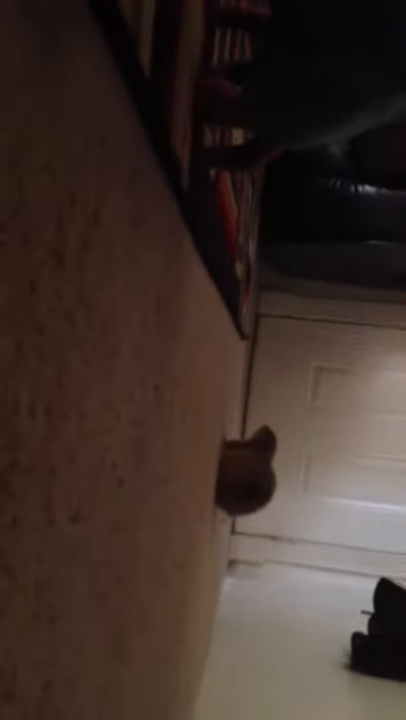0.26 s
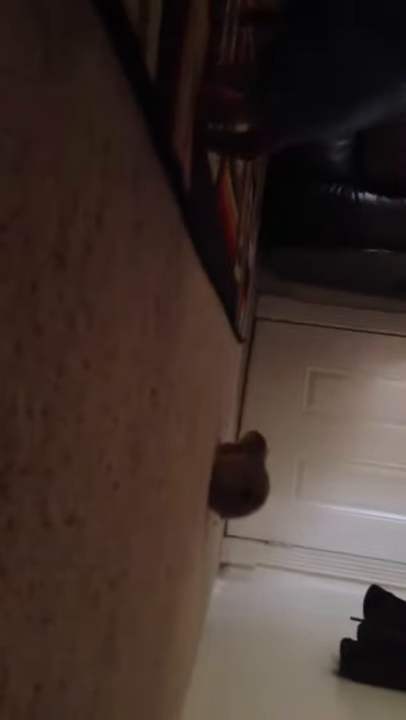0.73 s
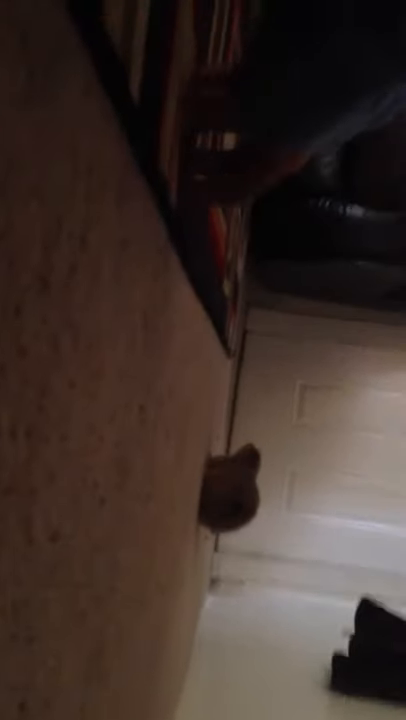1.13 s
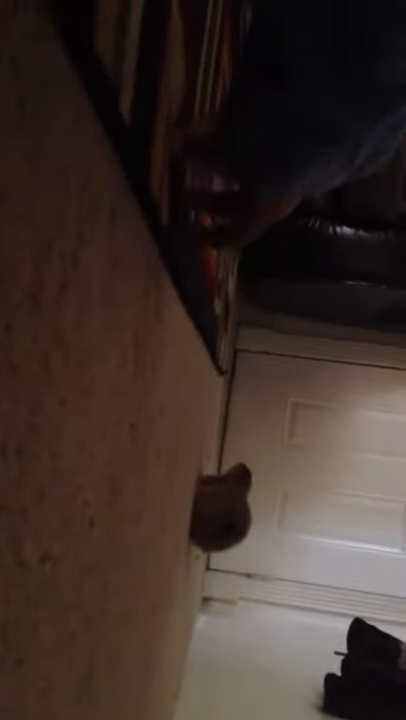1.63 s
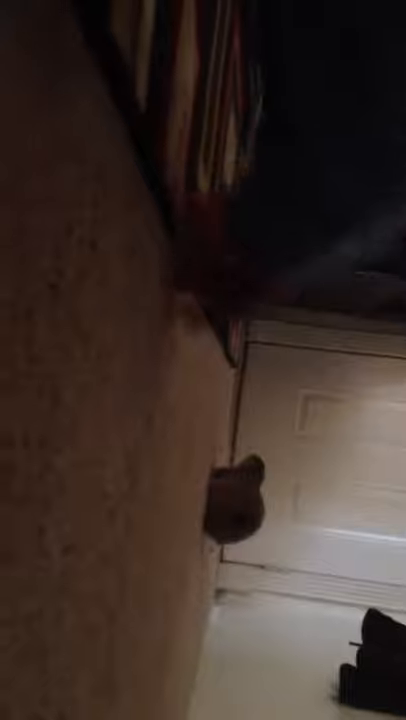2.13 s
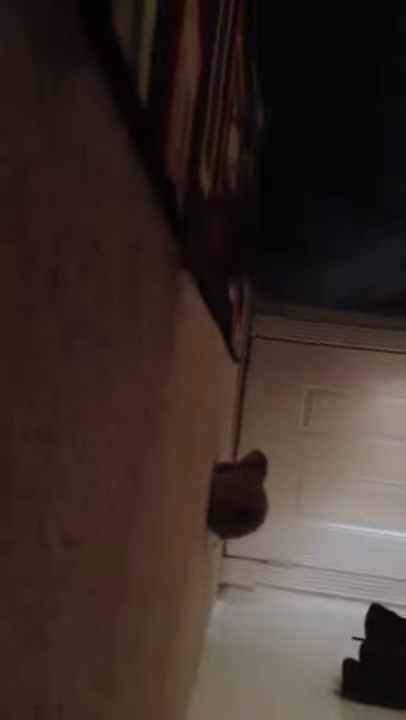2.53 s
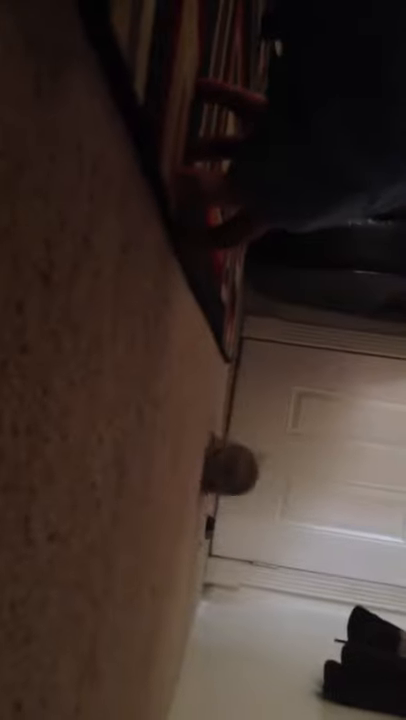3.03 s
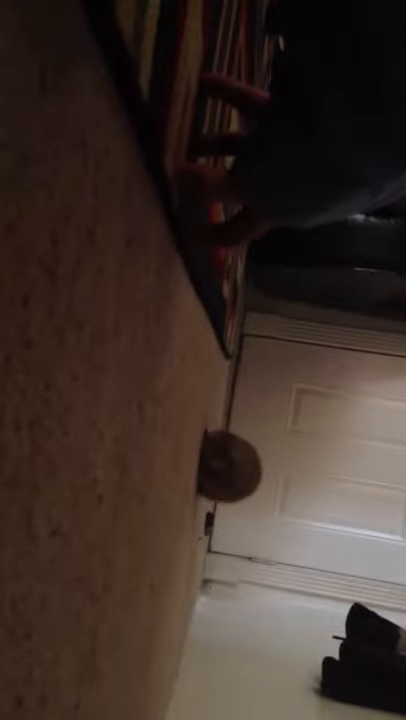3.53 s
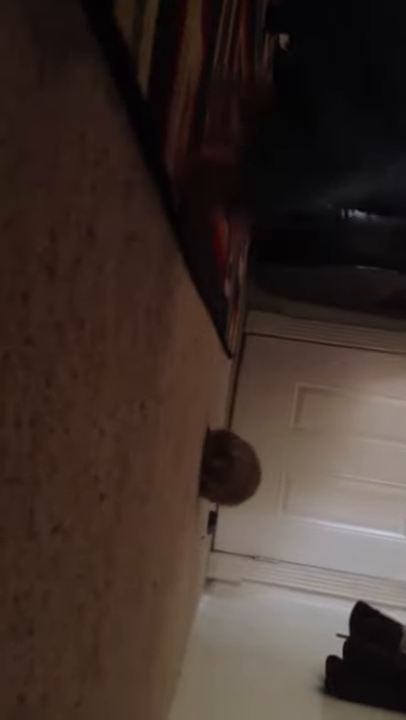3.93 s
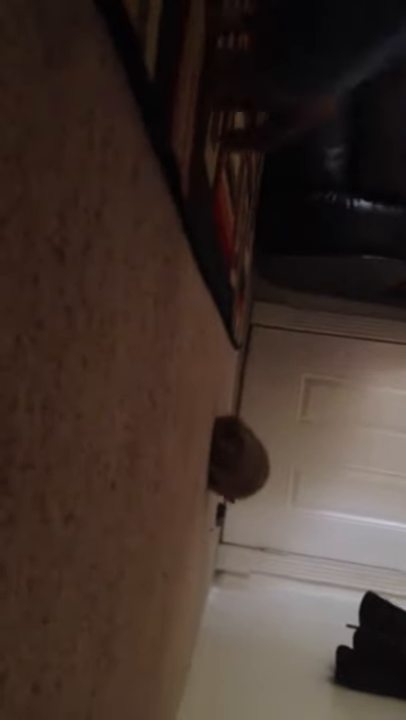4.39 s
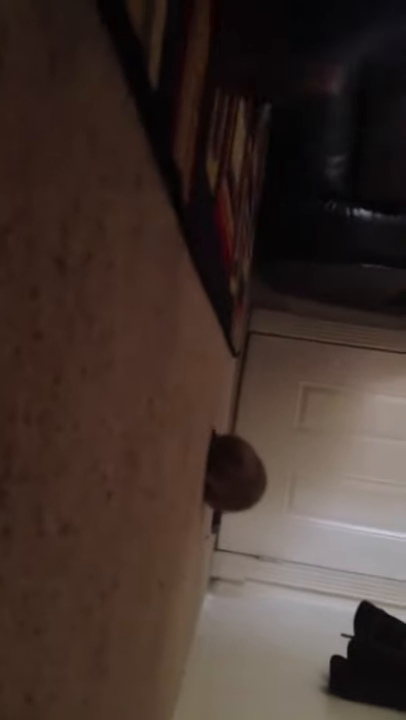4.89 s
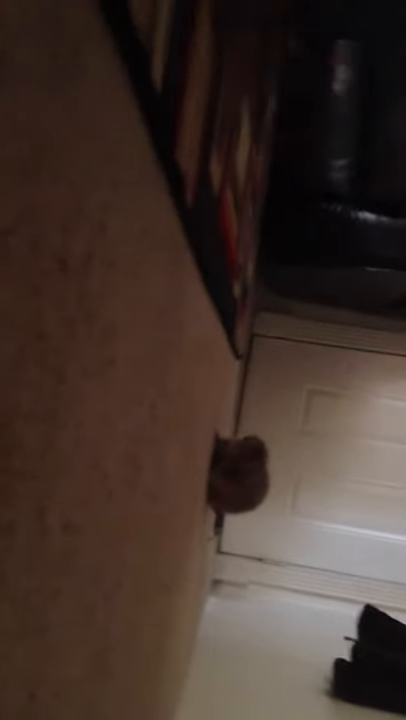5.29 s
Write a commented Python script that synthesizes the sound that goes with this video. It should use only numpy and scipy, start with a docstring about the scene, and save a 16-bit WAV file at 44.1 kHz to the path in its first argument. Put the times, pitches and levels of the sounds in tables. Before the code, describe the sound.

A hand and a small rodent play-fight on a rug, heard close and near the floor in a furnished room with a short, faint tail. Steady low air, soft hiss and a barely audible hum run throughout. A small dull bump comes at once, then from about 0.5 s quick strokes scuff the pile and drum the floor. Around 0.7 s there is a cluster of sharp little ticks with a soft thud; firm scratchy strokes follow to 1.3 s, with light taps and sleeve rustle. Lighter strokes and patter continue to 2.3 s, then thin out: a weak brush and tap near 2.6 s, another at 3.0 s. In the lull, a very brief soft low tone swells at 3.3 s. Strokes return at 3.7 s, crisp at 4.0 to 4.1 s, uneven through 4.5 s, strongest just before 5.0 s with a tick, then scuffing and rustling to the end at about 5.5 s.

```python
"""A hand and a small rodent play-fight on a rug, heard close, near the floor.
From the start: air, hiss and a faint hum (filtered noise); a sleeve drags and rustles (noise following the arm);
quick strokes scuff the pile and drum the floor (random fibre slips). Bumps (short pushes), light taps
(crunching contacts) and a few sharp ticks (bare pulses) fall among them. Strokes thin out after 2.3 s;
one soft low tone swells in the lull at 3.3 s, then the scuffle returns. A room tail follows it throughout."""
import sys
import numpy as np
from scipy import signal
from scipy.fft import rfft, irfft, next_fast_len
from scipy.io import wavfile
from scipy.ndimage import map_coordinates

SR = 44100
rng = np.random.default_rng(int(sys.argv[2]) if len(sys.argv) > 2 else 0)


def transcribe(signal):
    """Save signal, clipped to [-1, 1], as a 16-bit WAV file at the path in sys.argv[1]."""
    frames = np.atleast_2d(signal).T
    limited = np.clip(frames, -1, 1)
    pcm = np.round(limited * 32767).astype(np.int16)
    wavfile.write(sys.argv[1], SR, pcm)


N = 244755

# Ambient spectrum. Each row: frequency in Hz, relative density in dB per Hz.
AIR_SPECTRUM = [(15, -83), (25, -46), (86, -21.5), (122, -4.5), (203, -4), (232, -2), (265, -9), (441, -7),
                (491, -14), (936, -26), (2210, -26), (2390, -25), (5800, -27), (13300, -28), (15200, -30)]
# Arm movement. Each row: time in seconds, movement level in dB.
ARM_MOVEMENT = [(0.0, -73), (0.37, -66), (0.74, -59.5), (2.05, -59), (2.3, -64), (2.76, -71.5),
                (3.47, -78.5), (3.73, -77), (3.91, -63), (4.06, -58), (4.19, -66), (4.55, -69), (4.66, -73),
                (4.9, -75), (5.03, -64.5), (5.3, -60)]
# Cloth rustle spectrum. Each row: frequency in Hz, relative density in dB per Hz.
CLOTH_SPECTRUM = [(150, -43), (450, -1), (800, 1.5), (1250, -3), (1900, -10.5), (3000, -11), (6000, -15.5),
                  (9000, -23), (15000, -22)]
# Floor resonances. Each row: centre in Hz, width in Hz, relative gain in dB.
FLOOR_MODES = [(170, 54, -9), (249.4, 51, 0), (322.6, 46, -0.5), (393, 18, -4), (437, 45, -8.5),
               (491, 17.5, -5), (588, 85, -5)]
# Floor drumming spectrum. Each row: frequency in Hz, relative density in dB per Hz.
DRUM_SPECTRUM = [(30, -8), (70, -10), (110, -9), (160, 1), (300, 1), (480, -0.5), (620, -6), (900, -16),
                 (1600, -19), (4000, -29)]
# Strokes over the pile. Each row: peak time in seconds, rise in seconds, fall in seconds,
# press on the floor in dB, scrape in dB.
STROKES = [(.135, 0.11, 0.025, -53.5, -66), (.592, 0.036, 0.06, -45.5, -53), (.694, .015, 0.0039, -46, -56),
           (.739, .024, 0.038, -40, -51), (.865, 0.013, 0.023, -48, -46), (.923, .021, 0.008, -45, -71),
           (.999, 0.019, 0.051, -45.5, -54.5), (1.17, 0.022, .016, -39, -44),
           (1.223, 0.033, 0.04, -41.5, -59.5), (1.269, .004, .035, -46, -56.5),
           (1.445, .015, 0.0074, -58, -49.5), (1.488, 0.02, 0.018, -47, -56), (1.56, .03, 0.012, -48, -59),
           (1.707, 0.019, 0.0068, -64, -54.5), (1.752, 0.026, 0.072, -51.5, -62.5),
           (1.879, .035, 0.037, -60.5, -65), (1.957, .016, .008, -59, -46.5),
           (1.99, 0.026, 0.024, -47, -47.5), (2.055, .008, 0.017, -50.5, -68),
           (2.17, 0.036, 0.024, -53, -70.5), (2.22, 0.027, 0.0054, -47, -48.5),
           (2.254, 0.046, 0.063, -52.5, -64), (2.552, 0.086, .033, -56.5, -64),
           (3.046, 0.044, .041, -60, -72.5), (3.648, .033, .008, -61, -66), (3.727, .014, .055, -49.5, -52),
           (3.86, .018, 0.062, -55.5, -58), (4.004, 0.016, .011, -51, -42.5), (4.033, .018, 0.07, -47, -57),
           (4.115, .014, 0.034, -38.5, -47.5), (4.23, 0.036, 0.025, -58.5, -58),
           (4.385, .024, 0.036, -48, -56), (4.452, .02, 0.026, -51, -48), (4.484, .012, 0.045, -45.5, -53),
           (4.575, 0.061, 0.03, -50, -56), (4.685, 0.054, 0.021, -57, -62),
           (4.866, .029, 0.081, -52.5, -56.5), (4.889, .004, .014, -43, -50.5),
           (4.971, .022, 0.017, -38.5, -48.5), (4.986, 0.0051, 0.017, -34.5, -43),
           (5.116, .055, 0.0072, -52, -54), (5.219, .024, 0.042, -47, -57), (5.374, .046, .033, -43, -47),
           (5.445, .02, 0.046, -45.5, -48.5)]
# Pile scrape spectrum. Each row: frequency in Hz, relative density in dB per Hz.
SCRAPE_SPECTRUM = [(150, -23), (400, -9.5), (700, 5), (1100, 3), (1800, 2.5), (2700, 0.5), (3600, -7.5),
                   (6000, -22), (12000, -9)]
# Fibre fizz spectrum. Each row: frequency in Hz, relative density in dB per Hz.
FIZZ_SPECTRUM = [(1500, -44), (3200, 1.5), (4500, 0), (7000, -2.5), (10000, -6), (15000, -11.5)]
# Soft bumps on the floor. Each row: start in seconds, relative blow strength in dB, contact time in seconds.
BUMPS = [(0.0392, -32.5, 0.00037), (.0442, -21, 0.0012), (.719, -32, 0.00099), (.763, -30.5, 0.00091),
         (1.209, -35.5, 0.0005), (1.727, -40, 0.00087), (2.608, -45, 0.00078), (3.752, -37.5, 0.00039),
         (4.107, -35.5, 0.00072), (4.394, -34.5, 0.0004), (4.89, -39.5, 0.00053), (5.205, -38, 0.00072)]
# Bump pulse spectrum. Each row: frequency in Hz, relative magnitude in dB.
THUD_SPECTRUM = [(30, -45), (55, -34), (75, -23), (110, -17), (160, 0.5), (300, 5.5), (480, 4.5),
                 (620, -9.5), (850, -22), (1300, -6), (4000, -44), (9000, -84)]
# Clearest taps of fingertips and paws. Each row: start in seconds, relative level in dB.
CLEAR_TAPS = [(.135, -56), (.157, -58), (.551, -51), (.584, -44.5), (.898, -52), (.915, -47.5), (.982, -46),
              (1.006, -43.5), (1.211, -43.5), (1.269, -46), (1.545, -48), (1.571, -49), (1.728, -48.5),
              (1.752, -47), (1.817, -49.5), (2.567, -54.5), (4.102, -44), (4.888, -47), (4.947, -47),
              (5.168, -56.5), (5.366, -46), (5.517, -58)]
# Tap pulse spectrum. Each row: frequency in Hz, relative magnitude in dB.
TAP_SPECTRUM = [(80, -30), (200, -4), (400, 5.5), (800, -0.5), (1500, 2.5), (2300, -3.5), (3500, -12),
                (5800, -13), (7000, -37), (15000, -28)]
# Sharp ticks, as of a claw or nail catching. Each row: start in seconds, pulse peak in dB.
TICKS = [(0.159, -41.5), (0.7167, -19.5), (0.7191, -24), (0.73, -26.5), (.764, -34.5), (1.269, -45),
         (4.109, -43), (4.987, -28)]
# Tick pulse spectrum. Each row: frequency in Hz, relative magnitude in dB.
TICK_SPECTRUM = [(100, -17), (500, 6.5), (1200, 8), (3000, 2.5), (4500, -0.5), (6500, -4), (8000, -13),
                 (15000, -34)]
# Room decay. Each row: frequency in Hz, time to fall 60 dB in seconds.
ROOM_T60 = [(150, 0.61), (500, 0.098), (3000, 0.35), (12000, 0.3)]

BUSY_DB = -60  # movement of a busy arm
# cloth at that movement; growth in dB per dB of movement
DRAG_DB, DRAG_DB_PER_DB = -59.5, 1.13
RUSTLE_DB, RUSTLE_DB_PER_DB = -61, 0.99
SWELL_SHAPE = 1.74  # exponent: 1 = pointed, 2 = bell
BRISK_DB, FIRM_DB = -49.5, -51  # scrape and press of an ordinary stroke
FIZZ_DB, FIZZ_DB_PER_DB = -58, 0.56  # fizz of a brisk stroke; growth per dB of scrape
SCRAPE_HZ, DULL_OCT_PER_DB = 1160, 0.06  # pressing harder dulls the scrape
# faster and harder strokes shake higher floor modes
RUMBLE_HZ, RUMBLE_OCT_PER_DB, SHOVE_OCT_PER_DB = 355, 0.02, 0.0248
# fainter taps while the arm is busy, in the same level scale as the clear ones
STRAY_PER_S, STRAY_DB, STRAY_SPREAD_DB = 8, -55.5, 4.5
TOP_HZ = 15350


def amp(db):
    """Decibels to gain."""
    return 10 ** (np.asarray(db) / 20)


def unit(x):
    """Scale to rms 1."""
    return x / np.sqrt(np.mean(x ** 2) + 1e-20)


def along(points, hz):
    """Interpolate (Hz, value) points on a log frequency axis."""
    f, v = np.transpose(points)
    return np.interp(np.log(hz + 1), np.log(f + 1), v)


def wobble(knots_per_s):
    """Smooth random curve through normally distributed knots."""
    knots = rng.standard_normal(int(N * knots_per_s / SR) + 4)
    return map_coordinates(knots, [np.arange(N) * knots_per_s / SR])


def filtered(x, response):
    """Apply a complex response of frequency to x."""
    m = next_fast_len(len(x) + SR // 8)
    hz = np.fft.rfftfreq(m, 1 / SR)
    return irfft(rfft(x, m) * response(hz), m)[:len(x)]


def coloured(x, spectrum):
    """Shape x by the spectrum, at rms 1."""
    return unit(filtered(x, lambda hz: amp(along(spectrum, hz))))


def impulse(spectrum, size=4096):
    """Causal minimum-phase pulse of peak 1, by folding the cepstrum."""
    hz = np.fft.rfftfreq(size, 1 / SR)
    cepstrum = irfft(np.log(amp(along(spectrum, hz))))
    cepstrum[1:size // 2] *= 2
    cepstrum[size // 2 + 1:] = 0
    pulse = irfft(np.exp(rfft(cepstrum)))
    return pulse / np.abs(pulse).max()


def room_tone(hum_hz, width_hz):
    """Still air and microphone hiss, with a faint hum wavering as narrow-band noise."""
    hum = unit(filtered(rng.standard_normal(N), lambda hz: 1 / (1 + ((hz - hum_hz) / width_hz) ** 2)))
    air = coloured(rng.standard_normal(N), AIR_SPECTRUM)
    return amp(-62.5) * air + amp(-75.0) * hum


def movement(t_s):
    """Arm movement in dB against a busy arm."""
    return np.interp(t_s, *np.transpose(ARM_MOVEMENT)) - BUSY_DB


def slips(size, rate_per_s, spread_db, smooth):
    """Fibres let go at random moments and sizes, over an even friction noise."""
    sizes = amp(spread_db * np.clip(rng.standard_normal(size), -2, 2))
    jolts = rng.choice([-1, 1], size) * sizes
    lets_go = rng.random(size) < rate_per_s / SR
    return unit(jolts * lets_go) + smooth * rng.standard_normal(size)


def focus(hz, centre_hz, octaves):
    """Broad hump of gain around a centre."""
    return np.exp(-.5 * (np.log2((hz + 1) / centre_hz) / octaves) ** 2)


def floor_ring(hz):
    """Response of the floor's damped modes."""
    return sum(amp(db) * 1j * hz * width / (centre ** 2 - hz * hz + 1j * hz * width)
               for centre, width, db in FLOOR_MODES)


def drumming(grains, centre_hz):
    """Slips shake the floor's modes, most strongly around centre_hz."""
    shaken = filtered(grains, lambda hz: floor_ring(hz) * focus(hz, centre_hz, octaves=0.87))
    return coloured(shaken, DRUM_SPECTRUM)


def sleeve():
    """Cloth friction drags dully and rustles, following the arm's movement."""
    moving_db = movement(np.arange(N) / SR)
    grains = slips(size=N, rate_per_s=900, spread_db=3.0, smooth=1.42)
    grains = grains * amp(0.53 * wobble(45))
    drag = amp(DRAG_DB + DRAG_DB_PER_DB * moving_db) * drumming(grains, centre_hz=255)
    rustle = amp(RUSTLE_DB + RUSTLE_DB_PER_DB * moving_db) * coloured(grains, CLOTH_SPECTRUM)
    return drag + rustle


def swell(d_s, rise_s, fall_s):
    """Stroke strength, d_s from its peak."""
    return np.exp(-np.abs(d_s / np.where(d_s < 0, rise_s, fall_s)) ** SWELL_SHAPE)


def ripple(hz, depth_db, per_octave):
    """Random peaks and dips: every spot on the rug sounds a little different."""
    place = np.log2(1 + hz / 300) * per_octave
    knots = rng.standard_normal(int(place[-1]) + 3)
    return amp(depth_db * map_coordinates(knots, [place]))


def rubbing():
    """Strokes swell and fade; slips scrape, fizz and shake the floor, coloured by speed and press."""
    out = np.zeros(N)
    grip = amp(1.6 * wobble(130))  # catches and loosens within a stroke
    for peak_s, rise_s, fall_s, press_db, scrape_db in STROKES:
        first = max(0, int((peak_s - 4 * rise_s) * SR))
        last = min(N, int((peak_s + 4 * fall_s) * SR))
        near = np.arange(first, last)
        strength = swell(near / SR - peak_s, rise_s, fall_s)
        speed_db, force_db = scrape_db - BRISK_DB, press_db - FIRM_DB
        rumble_hz = RUMBLE_HZ * 2 ** (RUMBLE_OCT_PER_DB * speed_db + SHOVE_OCT_PER_DB * force_db)
        scrape_hz = SCRAPE_HZ * 2 ** (-DULL_OCT_PER_DB * force_db)

        grains = slips(size=len(near), rate_per_s=1500, spread_db=2, smooth=0.37)
        spot = filtered(grains, lambda hz: focus(hz, scrape_hz, octaves=1.6)
                        * ripple(hz, depth_db=2.0, per_octave=6))
        fibres = slips(size=len(near), rate_per_s=3000, spread_db=7.5, smooth=0.96)
        fibres = filtered(fibres, lambda hz: ripple(hz, depth_db=1.95, per_octave=3.055))

        fizz_level = amp(FIZZ_DB) * (amp(speed_db) * strength) ** FIZZ_DB_PER_DB
        for level, layer in [(amp(press_db) * strength, drumming(grains, rumble_hz)),
                             (amp(scrape_db) * strength, coloured(spot, SCRAPE_SPECTRUM)),
                             (fizz_level, coloured(fibres, FIZZ_SPECTRUM))]:
            # the random grain leaves each layer's rms as set
            out[near] += unit(layer * level * grip[near]) * np.sqrt(np.mean(level ** 2))
    return out


def bumps():
    """Each soft contact is a short push: a dull thud, then boards and room boom briefly."""
    out, t_s = np.zeros(N + SR), np.arange(SR // 4) / SR
    for start_s, db, contact_s in BUMPS:
        push = (t_s * np.exp(-2 * t_s / contact_s))[:SR // 50]
        decay = amp(-60 * t_s / 0.14)
        boom = rng.standard_normal(len(t_s)) * decay * (1 - np.exp(-t_s / 0.014))
        blow = amp(-6.0) * boom / np.linalg.norm(boom)
        blow[0] = 1  # the direct push
        hit = np.convolve(blow, push / push.sum())[:len(t_s)]
        out[round(start_s * SR):][:len(t_s)] += amp(db) * hit
    thud = signal.fftconvolve(out[:N], impulse(THUD_SPECTRUM))[:N]
    return amp(4.5) * thud + amp(-0.5) * filtered(thud, floor_ring)


def stray_taps(count=100):
    """Faint taps at random, more and firmer the more the arm moves: (start in seconds, level in dB)."""
    when, luck, size = rng.random((count, 3)).T
    start_s = when * N / SR
    db = STRAY_DB + movement(start_s) + STRAY_SPREAD_DB * (2 * size - 1)
    chance = STRAY_PER_S * amp(movement(start_s)) ** 2 * N / SR / count
    return np.transpose([start_s, db])[luck < chance]


def patter(life_s):
    """Each tap is one contact and a tiny crunch of fibres that dies in milliseconds."""
    out, t_s = np.zeros(N + SR), np.arange(SR // 25) / SR
    contact = impulse(TAP_SPECTRUM, size=1024)
    for start_s, db in [*CLEAR_TAPS, *stray_taps()]:
        crush = slips(size=len(t_s), rate_per_s=1500, spread_db=6, smooth=0.69) * np.exp(-t_s / life_s)
        crush[0] += 0.57 * np.linalg.norm(crush)  # first contact
        crunch = np.convolve(crush, contact)[:len(t_s)]
        out[round(start_s * SR):][:len(t_s)] += amp(db - 9.0) * unit(crunch)
    return out[:N]


def ticks():
    """Tiny hard contacts, too short to ring."""
    hits = np.zeros(N)
    for start_s, db in TICKS:
        hits[round(start_s * SR)] = amp(db)
    return signal.fftconvolve(hits, impulse(TICK_SPECTRUM))[:N]


def low_swell(peak_s, length_s, hz, db):
    """One soft, low sine swells and dies under a bell envelope."""
    d_s = np.arange(N) / SR - peak_s
    return amp(db) * np.exp(-(d_s / length_s) ** 2) * np.sin(2 * np.pi * hz * d_s)


def room(x):
    """Short furnished-room tail of decaying noise, its bass lasting longest."""
    hz, t_s, noise = signal.stft(rng.standard_normal(SR // 2), SR, nperseg=256)
    decay = amp(-60 * t_s / along(ROOM_T60, hz)[:, None])
    tail = signal.istft(noise * decay, SR, nperseg=256)[1]
    delayed = np.pad(tail / np.linalg.norm(tail), (round(.006 * SR), 0))
    return signal.fftconvolve(x, delayed)[:N]


def scene():
    """The scuffle, its room and the background."""
    scuffle = sleeve() + rubbing() + bumps() + patter(life_s=0.0057) + ticks()
    scuffle += low_swell(peak_s=3.264, length_s=0.013, hz=230, db=-48.0)
    return (room_tone(hum_hz=237, width_hz=12) + scuffle + amp(-12) * room(scuffle))[None]


def record(dry):
    """Band limit: nothing passes from TOP_HZ up."""
    return filtered(dry[0], lambda hz: hz < TOP_HZ)[None]


dry = scene()
out = record(dry)
transcribe(out)
```